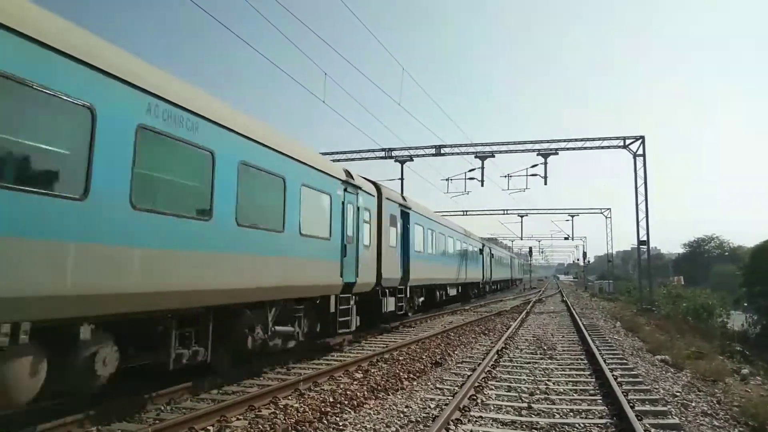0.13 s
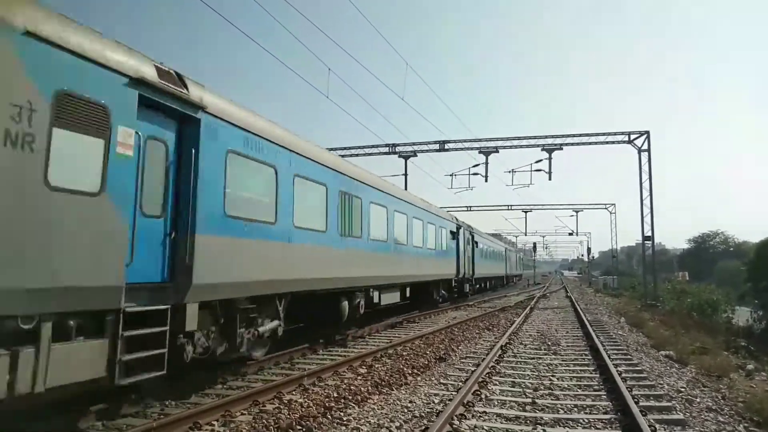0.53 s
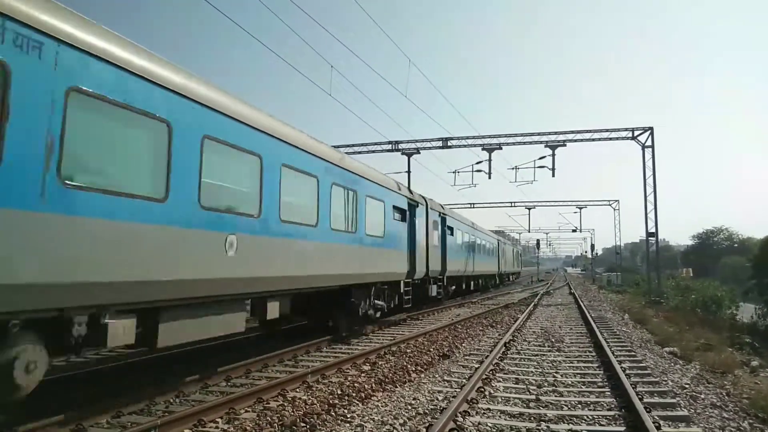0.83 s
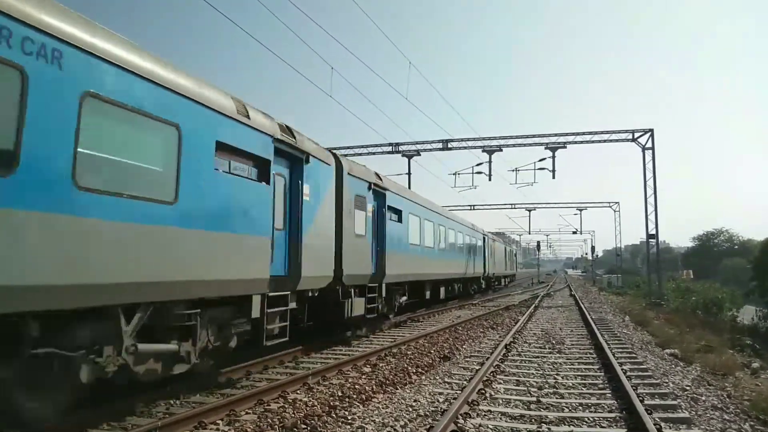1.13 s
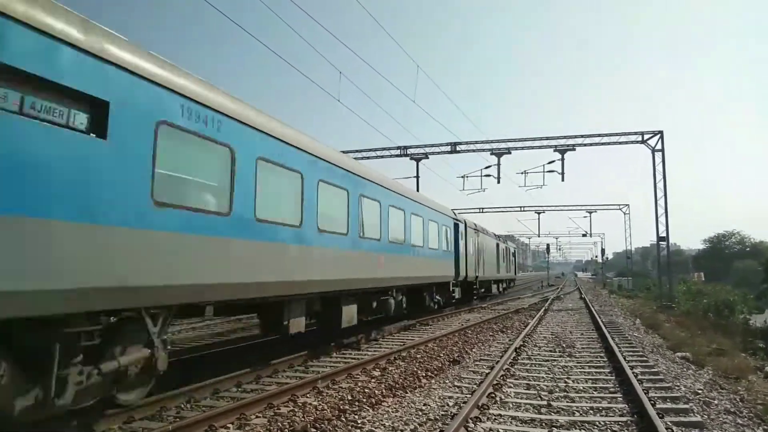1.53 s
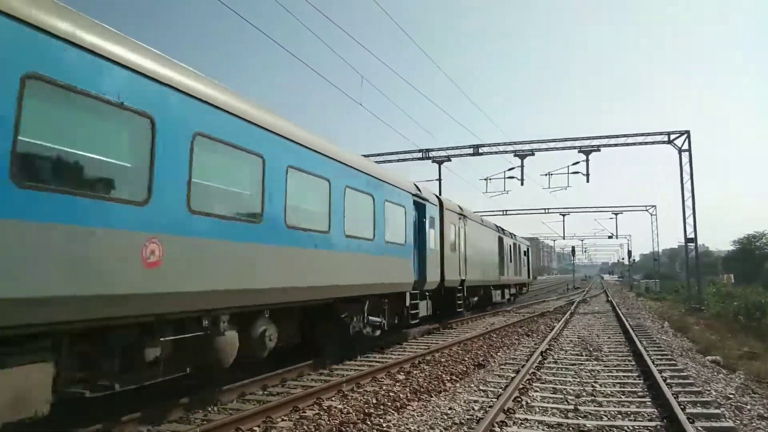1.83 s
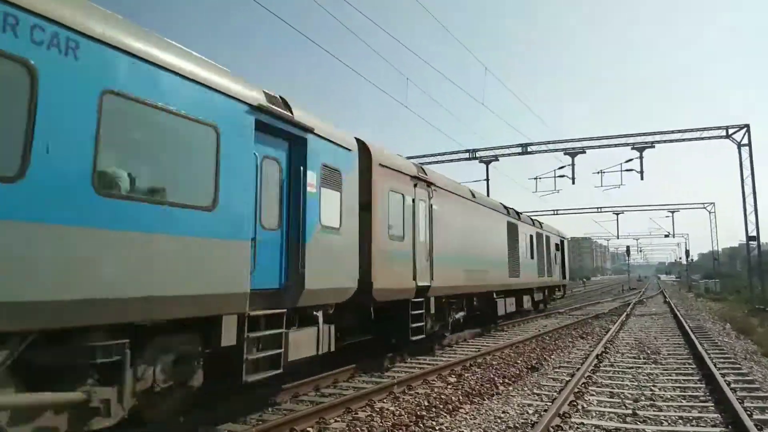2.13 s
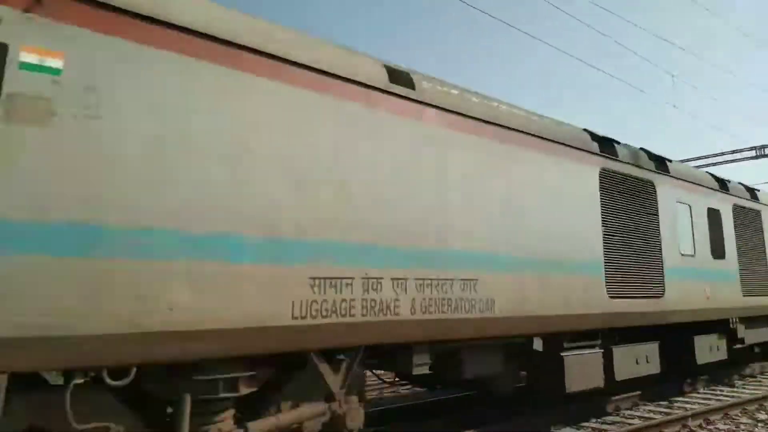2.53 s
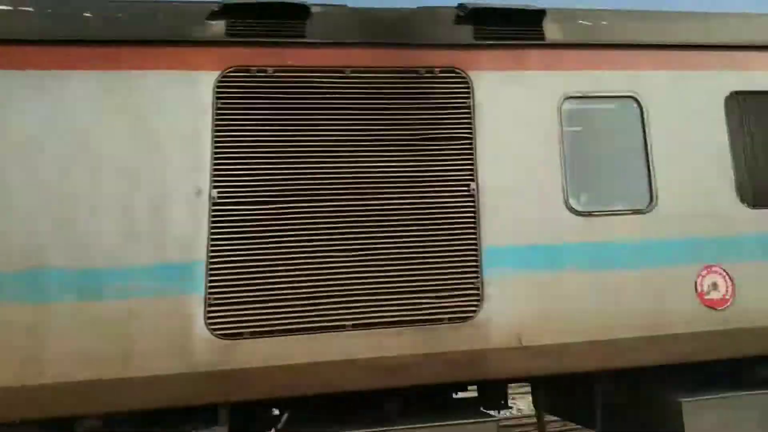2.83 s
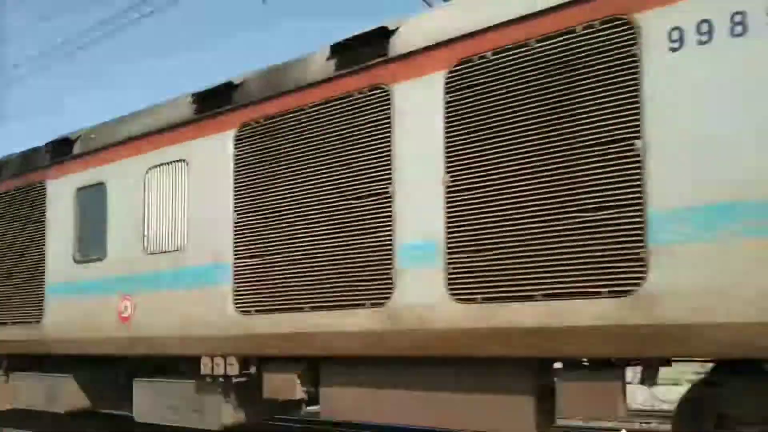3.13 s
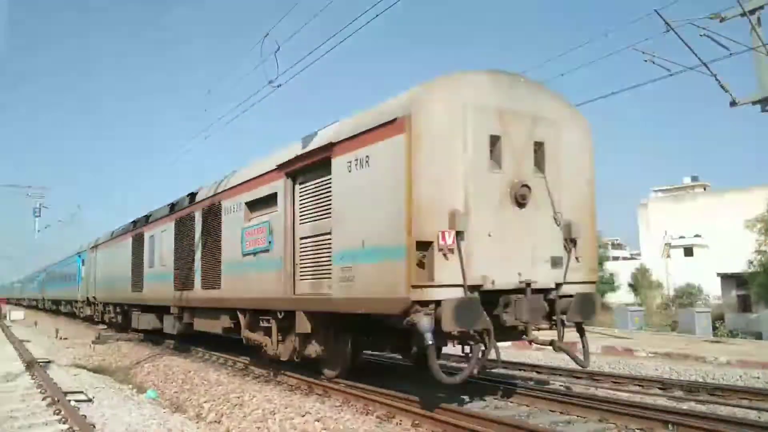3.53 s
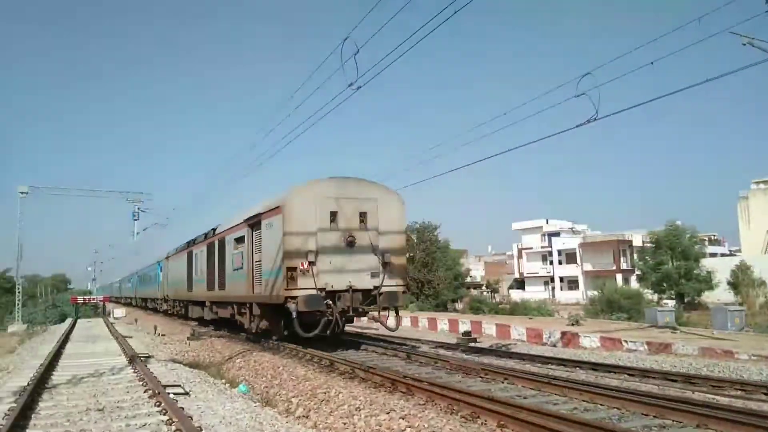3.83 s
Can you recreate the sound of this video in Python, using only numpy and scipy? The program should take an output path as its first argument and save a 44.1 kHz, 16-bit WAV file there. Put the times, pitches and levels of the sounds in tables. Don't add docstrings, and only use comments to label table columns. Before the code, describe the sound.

A passenger train rolls past very close, deep roar and wheel thumps fading after the last car.

```python
import sys
import numpy as np
from scipy import signal
from scipy.io import wavfile
from scipy.ndimage import uniform_filter1d

SR = 44100
rng = np.random.default_rng(int(sys.argv[2]) if len(sys.argv) > 2 else 0)


def wrap_up_sound(samples):
    columns = np.atleast_2d(samples).T
    tamed = np.clip(columns, -1, 1)
    steps = np.round(tamed * 32767).astype(np.int16)
    wavfile.write(sys.argv[1], SR, steps)


def rack_gain(trim_db):
    fader = np.asarray(trim_db, float)
    return 10 ** (fader / 20)


N = 176400


def evened(x):
    return x / np.sqrt(np.mean(x ** 2) + 1e-20)


def add(mix, start_s, sound):
    part = mix[round(start_s * SR):][:len(sound)]
    part += sound[:len(part)]


def decay(t, t60):
    return rack_gain(-60 * t / t60)


def excerpt(x, start_s, length):
    return np.resize(x[round(start_s * SR):][:length], length)


def resonate(x, hz, width, order=1):
    turn = np.exp(2j * np.pi * np.cumsum(hz * np.ones(len(x))) / SR)
    r = np.exp(-np.pi * width / SR)
    shifted = x * turn.conj() + 1e-18
    return 2 * (turn * signal.lfilter([(1 - r) ** order], np.poly([r] * order), shifted)).real


def noise(points, size, patch_db, flicker_db):
    hop = size // 4
    frames, hz = N // hop + 5, np.fft.rfftfreq(size, 1 / SR)
    a, b, patches = rng.standard_normal((frames, len(hz), 3)).T
    patches = uniform_filter1d(patches, size=8, axis=0)
    patches = evened(uniform_filter1d(patches, size=10, axis=1))
    flicker = evened(uniform_filter1d(rng.standard_normal(frames), size=5))
    f, db = np.transpose(points)
    colour_db = np.interp(np.log(hz + 1), np.log(f + 1), db, left=-70)[:, None]
    db = colour_db + patch_db * patches + flicker_db * flicker
    return evened(signal.istft((a + 1j * b) * rack_gain(db), nperseg=size, noverlap=size - hop)[1][:N])


def stroke(length, rise, fall):
    t = np.arange(0, length + 3 * fall, 1 / SR)
    return t, np.minimum(t / rise, 1) ** 2 * np.exp(-(np.maximum(t - length, 0) / fall) ** 2 * 2)


def passing(t):
    sag_per_s, bend_per_s2 = 0.14, 0.31
    return 1 - sag_per_s * t - bend_per_s2 * t ** 2


# time in seconds, deep roar in dB, rail and wheel roar in dB,
# ground boom in dB.
BOGIE_LEVELS = [(0.0, -28.5, -37.5, -31), (0.07, -21.5, -38, -29), (0.12, -30, -40.5, -25.5),
                (0.92, -20.5, -39, -30.5), (0.98, -23.5, -39.5, -26), (1.58, -26.5, -41, -34.5),
                (1.9, -26.5, -39, -24.5), (2.08, -33.5, -42.5, -30), (2.24, -22, -34.5, -34),
                (2.53, -27.5, -42, -30), (2.75, -21.5, -39.5, -41), (2.84, -27, -39, -28),
                (3.11, -31, -43, -41), (3.19, -24.5, -39, -31.5), (3.87, -44.5, -48, -37),
                (4.0, -39.5, -48.5, -38.5)]
# frequency in Hz, density in dB per Hz.
DEEP_SPECTRUM = [(53, -71.5), (90, 2), (241, 0.5), (402, -15.5), (1200, -46), (1560, -84.5), (2640, -120)]
# frequency in Hz, density in dB per Hz.
RAIL_SPECTRUM = [(180, -30.5), (300, -3), (337, -2), (391, -13.5), (535, -4), (685, -8), (1490, -19),
                 (3940, -24), (15500, -69.5)]
# frequency in Hz, density in dB per Hz.
GROUND_SPECTRUM = [(12, -49), (20, -33.5), (70, 10.5), (110, 2), (140, -28.5), (240, -120)]
# frequency in Hz, density in dB per Hz.
HAZE_SPECTRUM = [(5000, -28), (7000, -3), (10500, -5), (13000, -1.5), (15500, 1)]


def roar():
    s, *levels = np.transpose(BOGIE_LEVELS)
    deep_db, rail_db, ground_db = [np.interp(np.arange(N) / SR, s, db) for db in levels]
    ground = noise(GROUND_SPECTRUM, size=4096, patch_db=0.5, flicker_db=0.4) * rack_gain(ground_db - 2.0)
    deep = noise(DEEP_SPECTRUM, size=2048, patch_db=1.0, flicker_db=-0.8) * rack_gain(deep_db - 0.5)
    wash = rack_gain(0.5) * noise(RAIL_SPECTRUM, size=512, patch_db=2.5, flicker_db=1.62)
    haze = rack_gain(-30) * noise(HAZE_SPECTRUM, size=512, patch_db=1.2, flicker_db=3.0)
    return ground + deep + rack_gain(rail_db) * (wash + haze)


# time in seconds, clatter in dB, thud in dB.
AXLE_KNOCKS = [(0.075, -31, -22.5), (0.179, -30, -49), (0.252, -46, -40), (0.407, -28, -17),
               (0.497, -32, -14.5), (0.636, -42, -19), (0.717, -42, -30), (0.794, -44, -31),
               (0.828, -28, -27), (0.928, -33.5, -11), (0.977, -32, -37), (1.06, -30, -29),
               (1.312, -33.5, -19.5), (1.389, -27, -12), (1.73, -32.5, -16.5), (1.828, -32.5, -19),
               (1.867, -29.5, -23), (1.955, -30.5, -33), (2.217, -32.5, -21), (2.298, -27, -15.5),
               (2.408, -25, -20), (2.512, -38, -48), (2.624, -28.5, -14), (2.723, -24.5, -12.5),
               (2.868, -32, -21), (2.92, -49, -40), (3.032, -40, -25.5), (3.129, -36, -20.5),
               (3.179, -31.5, -12.5), (3.279, -33.5, -13), (3.591, -37.5, -26), (3.698, -38.5, -25.5),
               (3.895, -49, -41)]
# frequency in Hz, level in dB.
CLATTER_SPECTRUM = [(300, 2.5), (700, 2), (1500, -6), (3000, -12), (5000, -14), (7000, -34.5), (15000, -63)]
# frequency in Hz, width in Hz, level in dB.
THUD_MODES = [(161.5, 66, -2), (242, 88.2, -3), (309, 170, -14.5)]
# frequency in Hz, level in dB.
WHEEL_MODES = [(1830, 2.5), (2200, -6.5), (2700, 1), (3500, -9), (4650, -16)]


def knocks():
    knock_rise_s, clack_rise_s = 0.01425, 0.0027
    clatter_t60, thud_t60, ring_t60, blow_t60 = 0.29, 0.22, 0.18, 0.033
    out, t = np.zeros(N), np.arange(0, 1 / 4, 1 / SR)
    clatter = noise(CLATTER_SPECTRUM, size=256, patch_db=-1.0, flicker_db=2.0)
    rise = np.minimum(t / knock_rise_s, 1)
    clack_rise = np.minimum(t / clack_rise_s, 1)
    for s, clatter_db, thud_db in AXLE_KNOCKS:
        grit, colour = rng.standard_normal(len(t)), rng.standard_normal((len(WHEEL_MODES), 2))
        thud = evened(sum(rack_gain(db) * resonate(grit, f, w, order=2) for f, w, db in THUD_MODES))
        blow = grit * rise * decay(t, blow_t60)
        ring = sum(rack_gain(db + 2 * c) * resonate(blow, f * (1 + 0.0157 * d), 4.8 / ring_t60, order=2)
                   for (f, db), (c, d) in zip(WHEEL_MODES, colour))
        here = excerpt(clatter, s, len(t))
        add(out, s, clack_rise * here * rack_gain(clatter_db - 5.5) * decay(t, clatter_t60))
        add(out, s, rise * thud * rack_gain(thud_db - 3.5) * decay(t, thud_t60))
        add(out, s, evened(ring) * rack_gain(clatter_db - 26.5))
    return out


# start in seconds, length in seconds, wheel song in dB, fine hiss in dB.
FLANGE_RUBS = [(.21, 0.17, -55, -54.5), (0.294, 0.21, -43.5, -53), (0.96, 0.1, -46, -58.5),
               (1.162, 0.19, -60.5, -46.5), (1.457, 0.23, -47.5, -46.5), (1.793, 0.168, -47, -61.5),
               (2.075, 0.2, -40.5, -45), (2.395, 0.04, -38.5, -50.5), (2.509, 0.0097, -36, -47),
               (2.55, 0.159, -40.5, -52), (2.804, 0.0052, -42, -49), (2.904, 0.016, -66.5, -60),
               (3.182, 0.043, -68, -76), (3.447, 0.125, -52.5, -68), (3.943, 0.122, -58, -65.5)]
# frequency in Hz, density in dB per Hz.
HISS_SPECTRUM = [(1470, -27), (2500, -7), (3000, -7.5), (4680, -2), (5970, -12), (8160, -15), (10800, -23),
                 (13300, -18), (15500, -12)]


def rubs():
    lowest_mode_hz, mode_step_hz, mode_width_hz, low_blur = 3310, 455, 65, 5
    mode_spread_db, mode_swell_db, even_mode_db = 1.5, 3, -4
    rise_share, fall_s, flutter_db = 0.15, 0.086, 1.2
    swell_db, swell_s = -6.0, 0.06
    song_over_hiss_db, song_late_db, song_late_s = -3, -7, 0.09
    out, hiss = np.zeros(N), noise(HISS_SPECTRUM, size=512, patch_db=3.0, flicker_db=1.41)
    f, db = np.transpose(HISS_SPECTRUM)
    for s, length, song_db, hiss_db in FLANGE_RUBS:
        t, shape = stroke(length, rise_share * length, fall_s)
        grit, colour = rng.standard_normal(len(t)), rng.standard_normal((28, 8))
        low, high = np.zeros((2, len(t)))
        for k, (detune, spread, *swells) in enumerate(colour):
            hz = lowest_mode_hz + mode_step_hz * (k + detune / 8)
            group, blur = (high, 1) if k > 5 else (low, low_blur)
            width = mode_width_hz * (1 + hz / 9000) * blur
            mode = resonate(grit, hz * passing(t), width, order=2)
            mode_db = np.interp(np.log(hz), np.log(f), db) + mode_spread_db * spread
            mode_db += even_mode_db * (1 - k % 2)
            turn_db = mode_swell_db * np.interp(t, np.linspace(0, 0.5, num=6), swells)
            add(group, 0, mode * rack_gain(mode_db + turn_db))
        flutter = uniform_filter1d(rng.standard_normal(len(t)), size=1200)
        flutter = rack_gain(flutter_db * evened(flutter))
        late_db = song_late_db * np.exp(-(t / song_late_s) ** 2)
        song = evened(low) * rack_gain(song_db - 4.5)
        song += evened(high) * rack_gain(hiss_db + song_over_hiss_db + late_db)
        fine = excerpt(hiss, s, len(t)) * rack_gain(hiss_db + 2.5)
        onset = rack_gain(swell_db * min(4 * length, 1) * np.exp(-t / swell_s))
        add(out, s, shape * (song * flutter + fine) * onset)
    return out


# start in seconds, length in seconds, start pitch in Hz, level in dB.
MODE_SQUEALS = [(0.32, 0.13, 4800, -49), (.36, 0.15, 14100, -55), (0.393, 0.16, 10200, -65),
                (1.183, 0.14, 4680, -44), (1.19, 0.17, 1767, -51), (1.248, .08, 2690, -57),
                (1.48, 0.17, 2790, -54), (1.527, 0.23, 11950, -51.5), (1.58, 0.12, 13700, -57),
                (1.66, .1, 3800, -54), (1.7, 0.09, 5550, -56), (2.15, 0.19, 8300, -55),
                (2.2, 0.15, 5600, -52), (2.2, 0.1, 15400, -56), (2.517, 0.13, 1850, -50),
                (2.516, 0.094, 2700, -51), (2.571, 0.097, 7460, -57), (2.55, .22, 4720, -49),
                (2.6, 0.08, 3400, -53), (0.067, 0.023, 1960, -47), (0.818, 0.021, 914, -40),
                (.83, 0.059, 2750, -61), (1.855, 0.13, 2490, -54), (3.18, 0.16, 1806, -52.5),
                (3.567, 0.049, 4400, -50.5), (1.485, 0.04, 4600, -48), (2.2, 0.13, 6550, -58),
                (2.621, 0.042, 2585, -45), (2.719, 0.041, 2235, -45), (3.3, 0.054, 2176, -51),
                (0.35, .15, 8500, -62), (0.3, .07, 12600, -62), (1.33, .09, 7500, -60),
                (1.33, .09, 8050, -61), (1.39, .03, 2600, -52), (1.575, .05, 4600, -50),
                (1.66, .1, 4750, -54), (1.66, .07, 5200, -56), (1.67, .1, 3400, -56), (1.67, .1, 6750, -60),
                (1.67, .12, 7500, -61), (2.135, .11, 4550, -48), (2.2, .09, 3980, -52),
                (2.55, .15, 5520, -55), (2.56, .14, 6350, -59), (2.59, .12, 3900, -54),
                (2.52, .15, 8500, -61), (2.51, .02, 4650, -46), (2.73, .07, 3250, -54),
                (2.7, .1, 8100, -62)]


def squeals():
    steady_share, width_hz, wobble_hz = 0.55, 85, 22
    out = np.zeros(N)
    for s, length, hz, db in MODE_SQUEALS:
        t, shape = stroke(length, 0.0075, 0.05)
        grit = rng.standard_normal((len(t), 2)).T
        pitch = hz * passing(t) ** min(hz / 5000, 1)
        fuzz = np.sqrt(2) * evened(resonate(grit[0], pitch, width_hz * (1 + hz / 6000), order=2))
        wobble = wobble_hz * evened(uniform_filter1d(grit[1], size=500))
        steady = np.sqrt(2) * np.sin(2 * np.pi * np.cumsum(pitch + wobble) / SR)
        steady *= rack_gain(wobble[::-1] / 9)
        add(out, s, shape * rack_gain(db) * (steady_share * steady + (1 - steady_share) * fuzz))
    return out


# time in seconds, peak
# level in dB, pitch in Hz.
WHEEL_THUMPS = [(0.05, -11, 238), (0.12, -24, 102), (0.186, -26, 203), (0.285, -17.5, 164),
                (0.369, -14.5, 141.8), (0.428, -11.5, 186), (0.509, -10.5, 240), (0.656, -13, 236),
                (0.73, -12, 159), (0.894, -10, 193.6), (1.005, -15, 199), (1.255, -15, 139),
                (1.33, -15, 184), (1.483, -9.5, 148), (1.665, -17, 102), (1.697, -19, 161),
                (1.825, -13, 227), (1.879, -16, 104), (1.978, -16.5, 143), (2.041, -25, 204),
                (2.094, -19.5, 183), (2.151, -12, 183), (2.224, -15, 168), (2.473, -15.5, 149),
                (2.577, -11.5, 161), (2.732, -8, 235.6), (2.849, -18, 102.9), (2.966, -18, 150),
                (3.083, -28, 103), (3.084, -17.5, 166.5), (3.167, -14.5, 164), (3.301, -11.5, 205.7),
                (3.536, -23, 203), (3.705, -27, 143.6), (3.827, -37, 102),
                (.535, -8.5, 250.3),
    (.68, -15, 249.5),
    (.935, -9.5, 213),
    (2.745, -12.5, 257),
    (3.2, -15.5, 264.6),
    (.8, -14.5, 189),
]


def thumps():
    rise_s, t60 = 0.0057, 0.08
    out, t = np.zeros(N), np.arange(0, 1 / 8, 1 / SR)
    shape = (1 - np.exp(-t / rise_s)) ** 2 * decay(t, t60)
    shape /= shape.max()
    for s, db, hz in WHEEL_THUMPS:
        add(out, s, rack_gain(db - 6) * shape * np.sin(2 * np.pi * (hz * t + rng.random())))
    return out


def echoes(near):
    t = np.arange(0, 0.25, 1 / SR)
    tail = rng.choice([-1., 1.], len(t)) * (rng.random(len(t)) < 0.05)
    tail *= decay(t, 0.3) * (t > 0.004)
    return rack_gain(-11.5) * signal.fftconvolve(near, tail / np.linalg.norm(tail))[:N]


def scene():
    near = knocks() + rubs() + squeals() + thumps()
    return (roar() + near + echoes(near))[None]


def band_limit(x):
    return signal.sosfilt(signal.butter(12, 15880, fs=SR, output="sos"), x)


def record(dry):
    x = dry * np.minimum(np.arange(N) / (0.002 * SR), 1)
    lowpass = signal.firwin(511, 15560, window=("kaiser", 9), fs=SR)
    x = signal.oaconvolve(x, lowpass[None], "same")
    return band_limit(x)


dry = scene()
out = record(dry)
wrap_up_sound(out)
```